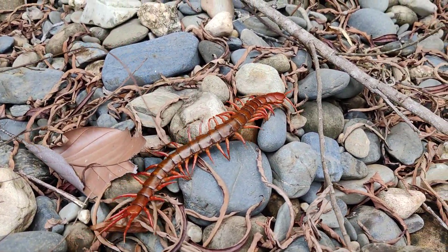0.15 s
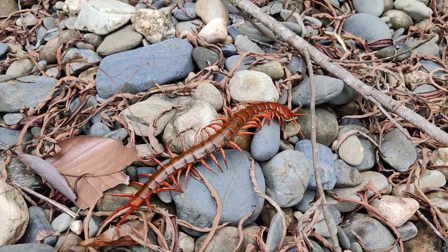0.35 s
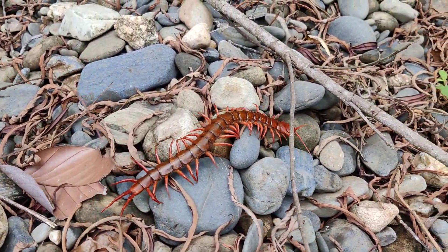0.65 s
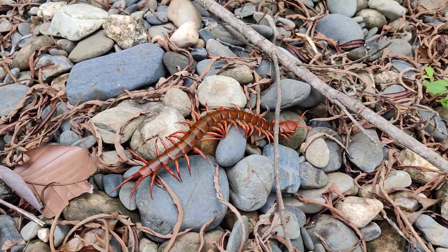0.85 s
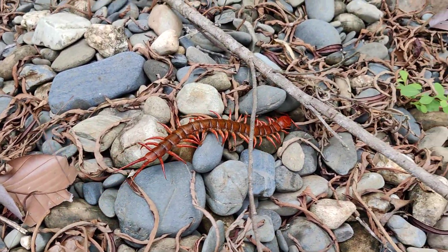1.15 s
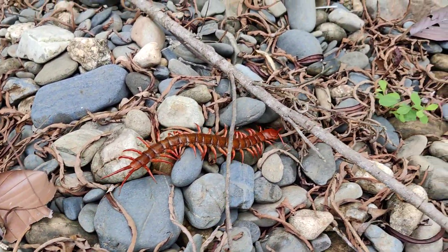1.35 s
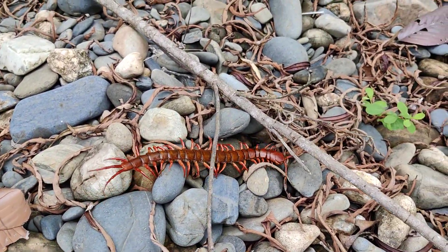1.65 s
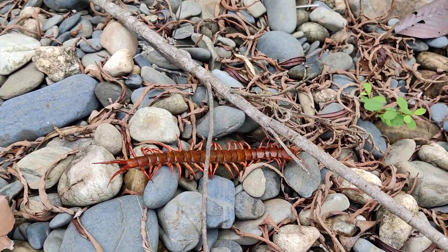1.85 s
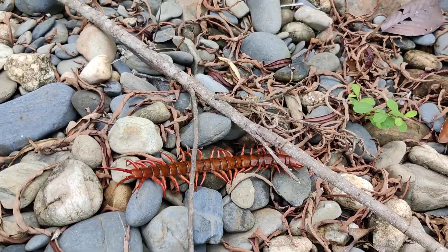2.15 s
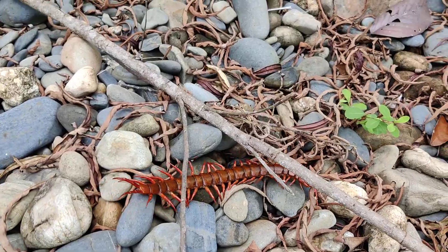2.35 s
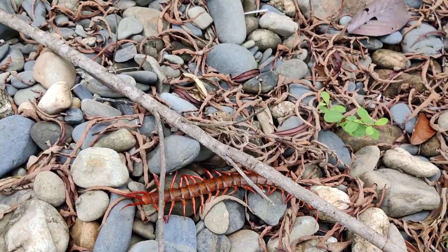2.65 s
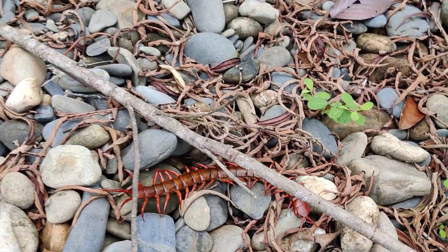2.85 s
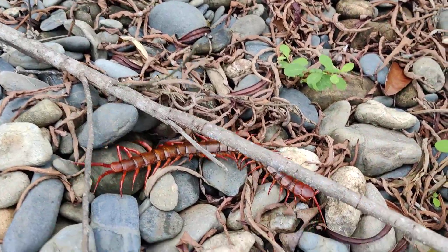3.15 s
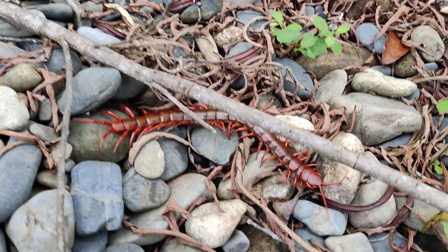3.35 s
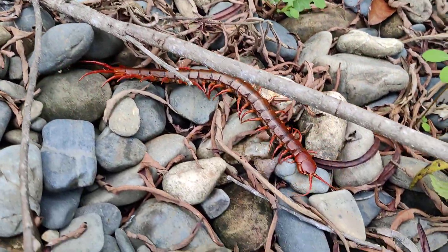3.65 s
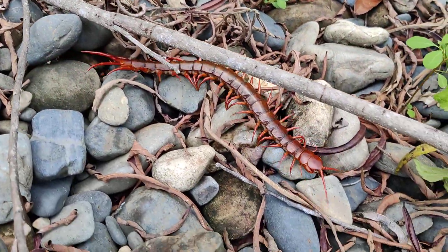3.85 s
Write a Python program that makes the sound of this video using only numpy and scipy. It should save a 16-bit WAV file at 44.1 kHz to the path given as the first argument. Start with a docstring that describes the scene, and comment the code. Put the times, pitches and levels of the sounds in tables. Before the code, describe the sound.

Dry ticks and snaps of litter under a large centipede, sparse and faint at first, then stronger; a pebble grinds once past halfway. Close stereo microphone outdoors, soft hiss, low handling rumble, distant birds.

```python
"""From the start, a soft outdoor hiss with handling rumble underneath: random noise shaped by pitch.
A large centipede crawls over pebbles and dry litter: random clicks patter, rustle, tick and snap.
Two birds sing far off, early and again late: gliding pure tones with echoes.
Halfway through, the hiss and the birds grow louder together and the snaps soon get stronger.
Then, once, a pebble grinds on its neighbours: a few jerky slips set stone tones ringing."""
import sys
import numpy as np
from scipy import signal
from scipy.fft import rfft, irfft
from scipy.io import wavfile

SR = 44100
rng = np.random.default_rng(int(sys.argv[2]) if len(sys.argv) > 2 else 0)


def generate_wav(sig):
    """Save sig (samples, or channels by samples) to the path in sys.argv[1] as 16-bit PCM at SR."""
    pcm = np.round(np.clip(np.atleast_2d(sig).T, -1, 1) * 32767).astype(np.int16)
    wavfile.write(sys.argv[1], SR, pcm)


N = 176400
TIME = np.arange(N) / SR
FREQS = np.fft.rfftfreq(N, 1 / SR)


def from_db(db):
    """Turn decibels into a plain multiplier."""
    return 10 ** (np.asarray(db) / 20)


def rms_one(x):
    """Scale a sound to an average strength (rms) of 1."""
    return x / np.sqrt(np.mean(x ** 2) + 1e-20)


def in_time(rows):
    """Join the points of a (time, value) table with straight lines, one value per sample."""
    s, values = np.transpose(rows)
    return np.interp(TIME, s, values)


def by_hz(rows):
    """Join the points of each table column along a logarithmic frequency scale."""
    hz, *columns = np.transpose(rows)
    log_freqs = np.log(FREQS + 1e-9)
    return [np.interp(log_freqs, np.log(hz), column) for column in columns]


def band(x, low_hz, high_hz, order=2):
    """Keep only the frequencies between two edges, without looking ahead in time."""
    high = min(high_hz, SR * .45)
    low = min(low_hz, high * .9)
    sos = signal.butter(order, [low, high], "band", fs=SR, output="sos")
    return signal.sosfilt(sos, x + 1e-18)


def drift(rate_hz):
    """Smooth random wander of spread 1; a higher rate wanders faster."""
    keep = np.exp(-(FREQS / rate_hz) ** 2)
    return rms_one(irfft(rfft(rng.standard_normal(N)) * keep, N))


def add(out, s, sound):
    """Mix a sound in, starting at time s."""
    i = max(int(s * SR), 0)
    out[..., i:i + sound.shape[-1]] += sound[..., :max(N - i, 0)]


# How alike the air sounds on the left and right: f/Hz, likeness (-1 to 1)
LIKENESS = [(100, 1), (380, 0.77), (700, 0.44), (1300, -0.61), (2400, 0.17), (8000, -0.067)]


def diffuse_noise(spectrum):
    """Stereo noise from all around; the two ports share its bass and differ higher up."""
    alike = np.clip(by_hz(LIKENESS)[0], -1, 1)
    mid, side = rfft(rng.standard_normal((2, N))) * from_db(by_hz(spectrum)[0])
    left_right = np.sqrt(1 + alike) * mid + np.sqrt(1 - alike) * side * [[1], [-1]]
    return rms_one(irfft(left_right, N))


def flicker(x, depth_db):
    """Overlapping half-octave bands swell and fade separately; the end bands take all that lies beyond."""
    centres = np.geomspace(125, 2000, 9)
    out = 0
    for share in np.eye(len(centres)):
        part = irfft(rfft(x) * by_hz(np.c_[centres, share])[0], N)
        out = out + part * from_db(depth_db * drift(25))
    return out


# Tone colour of the outdoor hiss: f/Hz, relative level/dB (per Hz)
HISS_COLOUR = [(100, 3), (600, -4), (1500, 3), (2500, 0.5), (4000, -1.5), (7000, -5), (10000, -9.5),
               (16000, -15.5)]
# Tone colour of the low outdoor air noise: f/Hz, relative level/dB (per Hz)
LOW_AIR_COLOUR = [(30, -6), (100, -6), (140, 0), (330, 0), (440, -1), (600, -12.5), (4000, -83)]
# Levels before the shared rise and fall of the far sounds, and depths of the swelling
HISS_DB, LOW_AIR_DB, HISS_PATCHY_DB, LOW_PATCHY_DB = -0.93, -6, 1.91, 3.5


def outdoor_air():
    """Outdoor hiss plus a lower noise, both shaped random noise that swells patchily."""
    hiss = from_db(HISS_DB) * flicker(diffuse_noise(HISS_COLOUR), HISS_PATCHY_DB)
    low_air = from_db(LOW_AIR_DB) * flicker(diffuse_noise(LOW_AIR_COLOUR), LOW_PATCHY_DB)
    return hiss + low_air


# Tone colour of the handling rumble: f/Hz, relative level/dB (per Hz)
RUMBLE_COLOUR = [(3, -22), (9, 0), (16, -9.5), (30, -21.5), (60, -23), (130, -35.5), (250, -45.5),
                 (1000, -76)]
# Rise and fall of the handling rumble on the right port: t/s, level/dB
HANDLING_LEVEL = [(0, -66), (.7, -55), (1.5, -65.5), (1.95, -46.5), (2.45, -45), (3, -38), (4, -41.5)]
RUMBLE_LEFT_DB = -24.5  # left port compared with the right


def handling():
    """Slow lumpy pressure from the hand: very low random noise, mostly on the right port."""
    lumps = rms_one(irfft(rfft(rng.standard_normal((2, N))) * from_db(by_hz(RUMBLE_COLOUR)[0]), N))
    return lumps * from_db(in_time(HANDLING_LEVEL)) * from_db([[RUMBLE_LEFT_DB], [0]])


CRACK_SPREAD_DB = 2.5  # how unevenly strong the tiny cracks are


def cracks(per_s, size):
    """Random clicks of uneven size, reaching each port with a strength of their own."""
    born = rng.random(size) < per_s / SR
    boost = from_db(CRACK_SPREAD_DB * np.minimum(rng.exponential(1, size), 3))
    return born * boost * rng.standard_normal((2, size))


# Average step rate, level compared with the far sounds' level curve, and frequency edges
STEPS_PER_S, STEPS_DB, STEPS_LOW_HZ, STEPS_HIGH_HZ = 110, -14.5, 2600, 12000


def steps(air_db):
    """Faint patter of legs on the litter: sparse random clicks that follow the air level."""
    patter = rms_one(band(cracks(STEPS_PER_S, N), STEPS_LOW_HZ, STEPS_HIGH_HZ))
    return from_db(STEPS_DB + air_db) * patter


def echoes(x, t60):
    """Scattered reflections, different at each port; they fade by 60 dB in t60 seconds."""
    t = TIME[:SR // 2]
    fade = from_db(-60 * t / t60) * (1 - np.exp(-t / 0.0021))  # soft start, then decay
    tail = rng.standard_normal((2, len(t))) * fade
    tail /= np.sqrt(np.sum(tail ** 2) / 2)
    return signal.fftconvolve(np.atleast_2d(x), tail, axes=1)[:, :N]


def note(hz, db, taper=0.54):
    """A pure tone that follows a pitch path, rising and falling softly."""
    swell = signal.windows.tukey(len(hz), taper)
    return from_db(db) * np.sqrt(2) * swell * np.sin(2 * np.pi * np.cumsum(hz) / SR)


# All bird levels come before the shared level of the far sounds; BIRD_DB also lowers the warbler.
# A warbler's rising notes: start t/s, length t/s, start f/Hz, end f/Hz, relative level/dB
SLURS = [(.01, 0.028, 2610, 2650, -0.5), (0.181, 0.045, 2100, 2300, -2.5), (0.258, 0.044, 2345, 2640, 0.5),
         (.27, 0.034, 3080, 3180, -0.5), (0.498, 0.04, 2144, 2480, 1), (0.542, 0.036, 2290, 2620, 2),
         (0.758, 0.026, 1970, 2270, 1.5), (0.796, 0.05, 2245, 2640, 0), (0.934, 0.069, 1930, 2300, -4),
         (1.007, 0.054, 2210, 2710, -3), (1.234, 0.058, 1940, 2180, -2), (1.329, 0.029, 2470, 2640, 5.5),
         (2.983, 0.039, 2400, 2500, -7), (3.198, 0.033, 2075, 2330, 1), (3.232, 0.07, 2170, 2640, -4),
         (3.545, 0.045, 2230, 2760, 2.5), (3.757, 0.069, 3397, 3500, -4.5), (3.824, .03, 2180, 2350, -0.5),
         (3.857, 0.053, 2195, 2750, 7)]
# Its long wavering whistles: start t/s, length t/s, middle f/Hz, relative level/dB
WHISTLES = [(0.319, 0.172, 2740, -1), (2.656, 0.23, 1740, -6), (3.73, 0.153, 2745, -4.5)]
# A second bird's thin, high arched calls: middle t/s, relative level/dB
THIN_CALLS = [(0.274, -11), (0.724, -10.5), (1.179, -11), (2.084, -12), (3.454, -14.5), (3.898, -12.5)]
WAVER_HZ, WAVER_CYCLES, FLICK_HZ = 61, 1.376, 171  # pitch swing, swings per whistle, final upward flick
THIN_TOP_HZ, THIN_SAG_HZ, THIN_LENGTH_S = 8100, 1800, 0.11
THIN_BLUR_HZ = 403  # speed of the random flutter that makes the thin calls buzz
BIRD_DB, BIRD_ECHO_DB, BIRD_T60_S = -6.5, -3.5, 0.39


def birds():
    """Rising notes, wavering whistles and thin buzzy arches, all gliding tones blurred by the trees."""
    warbler, thin = np.zeros(N), np.zeros(N)
    for s, length, start_hz, end_hz, db in SLURS:
        add(warbler, s, note(np.linspace(start_hz, end_hz, int(length * SR)), db))
    for s, length, hz, db in WHISTLES:
        u = np.linspace(0, 1, int(length * SR))
        waver = WAVER_HZ * np.cos(2 * np.pi * WAVER_CYCLES * u)
        add(warbler, s, note(hz - waver + FLICK_HZ * u ** 10, db, taper=.25))
    u = np.linspace(-1, 1, int(THIN_LENGTH_S * SR))
    arch_hz = THIN_TOP_HZ - THIN_SAG_HZ * u ** 2
    for s, db in THIN_CALLS:
        add(thin, s - THIN_LENGTH_S / 2, note(arch_hz, db, taper=0.12))
    song = from_db(BIRD_DB) * warbler + thin * drift(THIN_BLUR_HZ)
    return song + from_db(BIRD_ECHO_DB) * echoes(song, BIRD_T60_S)


# Litter shifts in short runs of tiny cracks:
# middle t/s, half-length t/s, level/dB (before the swell and fade), lower edge f/Hz, upper edge f/Hz
RUSTLES = [(.02, 0.017, -69, 2540, 7900), (1.647, 0.025, -59.5, 300, 13200),
           (1.762, 0.024, -59, 2870, 15000), (1.925, 0.015, -49.5, 150, 5040),
           (1.939, 0.0096, -48.5, 1800, 4740), (2.313, 0.019, -51.5, 4770, 13100),
           (2.404, 0.012, -56, 199, 290), (2.557, 0.027, -52.5, 125, 650),
           (2.5987, 0.0098, -30, 1500, 12000), (2.597, 0.0067, -45, 131, 1000),
           (2.62, 0.0088, -61, 2520, 4000), (2.703, 0.015, -52.5, 198, 3950),
           (2.838, 0.012, -37, 1920, 6000), (2.858, 0.03, -46.5, 2160, 5000), (2.842, 0.027, -46, 98, 700),
           (2.942, 0.015, -43, 9100, 16000), (2.946, 0.028, -51.5, 300, 9050),
           (3.613, 0.023, -47, 500, 6500)]
CRACKS_PER_S = 2400


def rustles():
    """Dense cracks swell and fade as a patch of litter gives way."""
    out = np.zeros((2, N))
    t = TIME[:SR // 5] - .1  # zero at the middle of the run
    for s, half_s, db, low_hz, high_hz in RUSTLES:
        grains = rms_one(band(cracks(CRACKS_PER_S, len(t)), low_hz, high_hz))
        swell = np.exp(-(t / half_s) ** 2)
        add(out, s + t[0], from_db(db) * grains * swell)
    return out


# Twigs and leaf stalks tick and snap:
# start t/s, relative level/dB (SNAP_DB is added), lower edge f/Hz, upper edge f/Hz
SNAPS = [(0.108, -47.5, 7000, 12600), (0.593, -51, 9000, 15500), (1.177, -50.5, 4500, 13000),
         (1.545, -51.5, 4000, 15000), (1.592, -42, 1960, 15000), (1.642, -43, 1000, 10100),
         (1.714, -47, 1500, 4480), (1.754, -54, 6000, 15000), (1.761, -42, 4500, 14000),
         (1.819, -48, 1200, 14000), (1.892, -44, 2500, 5030), (2.010, -43.5, 1990, 7800),
         (2.264, -41, 6000, 14700), (2.3005, -28, 6000, 12500), (2.694, -34, 676, 4030),
         (2.699, -27.5, 3100, 7200), (2.708, -30, 2700, 7000), (2.808, -27.5, 2650, 4800),
         (2.8292, -15.5, 2960, 6000), (2.8337, -41, 2950, 3760), (2.839, -27, 2880, 4600),
         (2.847, -23.5, 2700, 5500), (2.85, -30, 2700, 3420), (2.8536, -23.5, 2680, 5130),
         (2.856, -28.5, 3000, 14800), (2.863, -26, 3170, 3700), (2.932, -30.5, 10600, 15000),
         (2.94, -28, 10100, 16000), (2.9467, -26, 6000, 13900), (2.96, -27.5, 640, 1500),
         (3.140, -26, 8300, 13300), (3.1622, -30.5, 2620, 13900), (3.185, -29, 5500, 13900),
         (3.2354, -37.5, 6000, 14000), (3.337, -37, 6460, 14000), (3.601, -19.5, 2040, 4800),
         (3.602, -23, 3020, 3370), (3.6031, -25.5, 2000, 5040)]
SNAP_DB, SPLINTER_SHARE, SNAP_T60_S = 1.5, .32, .008
SNAP_BODY_DB, BODY_LOW_HZ, BODY_HIGH_HZ = -11.5, 400, 6000  # the faint broad knock


def snaps():
    """A click and a brief spray of splinters, coloured by the size of what breaks, over a faint knock."""
    out = np.zeros((2, N))
    t = TIME[:1024]
    for s, db, low_hz, high_hz in SNAPS:
        splinters = rng.standard_normal((2, len(t))) * from_db(-60 * t / SNAP_T60_S)
        burst = (t == 0) + SPLINTER_SHARE * splinters
        knock = rms_one(band(burst, BODY_LOW_HZ, BODY_HIGH_HZ, order=1))
        snap = rms_one(band(burst, low_hz, high_hz)) + from_db(SNAP_BODY_DB) * knock
        snap /= np.sqrt(np.sum(snap ** 2, axis=1, keepdims=True) / 10)  # same energy at each port
        add(out, s, snap * from_db(SNAP_DB + db))
    return out


# A pebble slips in jerks: t/s, relative level/dB
SLIPS = [(2.588, -11), (2.5905, 0), (2.5946, 1.5), (2.5964, -2.5), (2.5982, -3), (2.6002, -5),
         (2.6048, -22)]
# Ringing tones of the pebble bed: f/Hz, relative level/dB, time to fade by 60 dB t/s
PEBBLES = [(771, -12, 0.032), (1056, -10.5, 0.036), (1740, -13, 0.023), (2107, -11.5, 0.047),
           (2700, -10.5, 0.012), (3040, -2.5, 0.015), (3400, -10, 0.018), (4040, -2.5, 0.015),
           (4770, -3, 0.01), (5500, -4, 0.01)]
PEBBLE_DB, PEBBLE_CRACK_DB = -23, -18  # added to the ring and to the dry crack


def pebble():
    """Every slip gives a dry crack and strikes each ringing tone with its own strength."""
    s, db = np.transpose(SLIPS)
    at = (s * SR).astype(int)
    ring = np.zeros(N)
    for hz, mode_db, t60 in PEBBLES:
        strike_db = PEBBLE_DB + db + mode_db + rng.normal(0, 2.2, len(s))
        strikes = np.zeros(N)
        strikes[at] = from_db(strike_db) * rng.choice([-1, 1], len(s))
        # a two-step feedback filter rings at hz; r is what is left after each sample
        r, w = from_db(-60 / (t60 * SR)), 2 * np.pi * hz / SR
        ring += signal.lfilter([0, np.sin(w)], [1, -2 * r * np.cos(w), r * r], strikes + 1e-18)
    clicks = np.zeros(N)
    clicks[at] = from_db(PEBBLE_CRACK_DB + db)
    return ring + band(clicks, low_hz=1500, high_hz=7000)


NEAR_LEFT_DB, LEFT_LAG_S, SHARED_BASS_HZ = 1.5, 0.00015, 870


def at_ports(x):
    """Both ports get the same bass, then close sounds reach the left a little later and stronger."""
    lowpass = signal.butter(2, SHARED_BASS_HZ, fs=SR, output="sos")
    bass_gap = signal.sosfiltfilt(lowpass, x[1] - x[0])
    left = np.interp(TIME - LEFT_LAG_S, TIME, x[0] + bass_gap)
    return np.array([from_db(NEAR_LEFT_DB) * left, x[1]])


# Shared rise and fall of hiss, low air and birds, also followed by the steps: t/s, level/dB
AIR_LEVEL = [(0, -67.5), (.2, -71.5), (.65, -66.5), (1.1, -67.5), (1.35, -74), (1.56, -73.5), (1.65, -66),
             (1.85, -62.5), (2, -58.5), (2.35, -58.5), (2.8, -52), (3.3, -55), (3.65, -53), (4, -56.5)]
GROUND_ECHO_DB, GROUND_T60_S = -11.5, .12


def scene():
    """Close litter sounds over the far forest, whose parts swell together."""
    air_db = in_time(AIR_LEVEL)
    far = from_db(air_db) * (outdoor_air() + birds())
    near = steps(air_db) + rustles() + snaps() + pebble()
    near_with_echo = near + from_db(GROUND_ECHO_DB) * echoes(near, GROUND_T60_S)
    return far + handling() + at_ports(near_with_echo)


# Tone colour of the two microphone ports: f/Hz, left level/dB, right level/dB
PORTS = [(1000, 5, 5), (1500, 3, 4), (2390, 2, 8.5), (3310, 1, 12.5), (4020, 1, 1), (5500, 1.5, 3),
         (6510, 5.5, -10.5), (7440, 0, -17), (11100, 2.5, 1), (16000, 3.5, 0.5)]
CUTOFF_HZ = 16100


def record(dry):
    """Each port adds its own colour, never ahead of the sound; the top is cut steeply."""
    # folding the log spectrum's transform onto positive times gives a filter that acts at once
    cepstrum = irfft(np.log(from_db(by_hz(PORTS))), N)
    fold = np.r_[1, np.full(N // 2 - 1, 2), np.zeros(N - N // 2)]
    colour = irfft(np.exp(rfft(cepstrum * fold)), N)[:, :512]
    heard = signal.fftconvolve(dry, colour, axes=1)[:, :N]
    top_cut = signal.ellip(10, .2, 70, CUTOFF_HZ, fs=SR, output="sos")
    return signal.sosfilt(top_cut, heard)


dry = scene()
out = record(dry)
generate_wav(out)
```